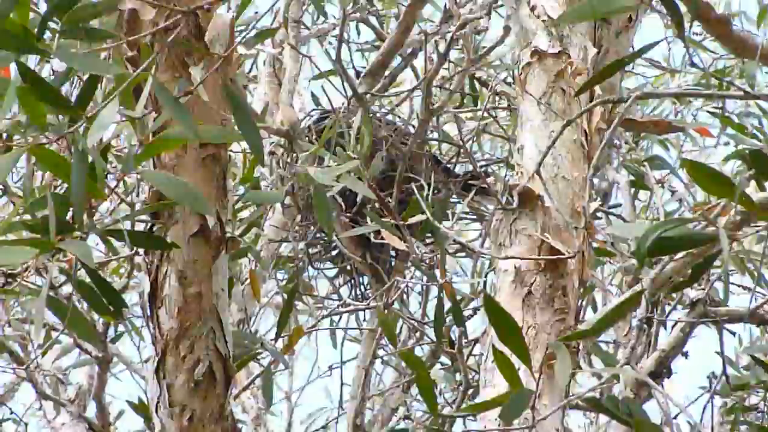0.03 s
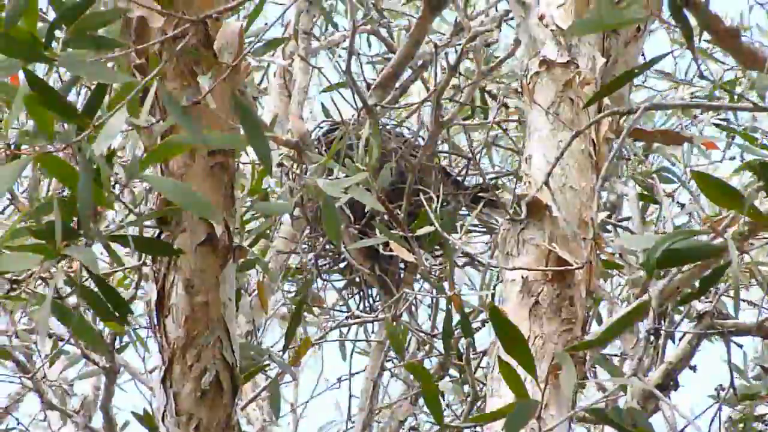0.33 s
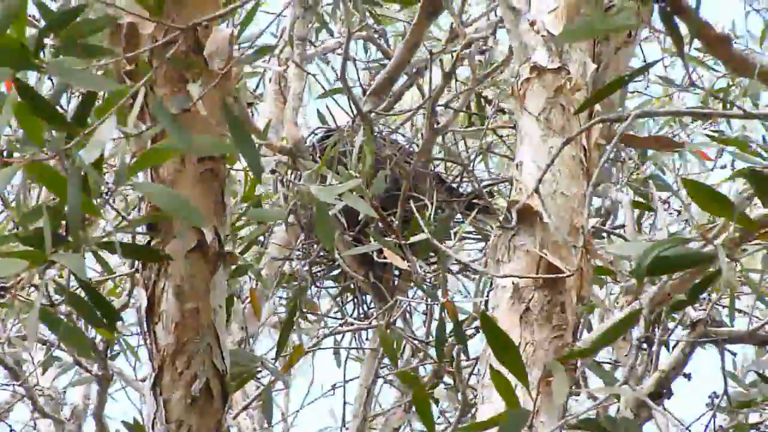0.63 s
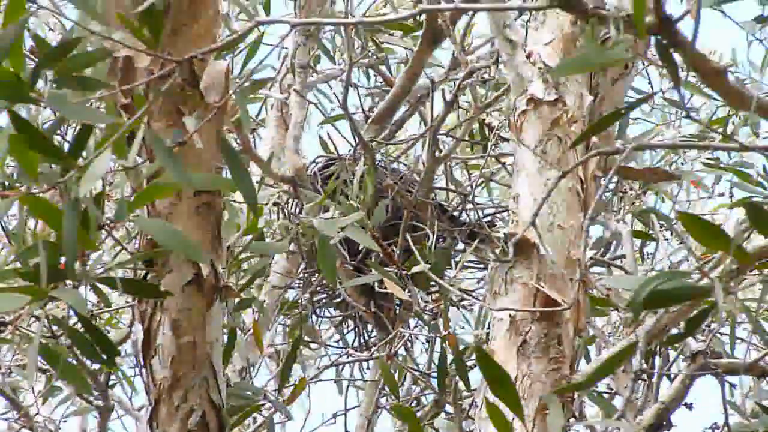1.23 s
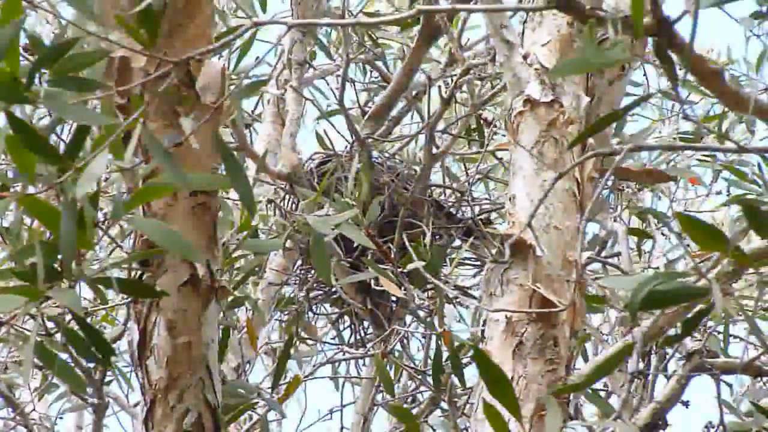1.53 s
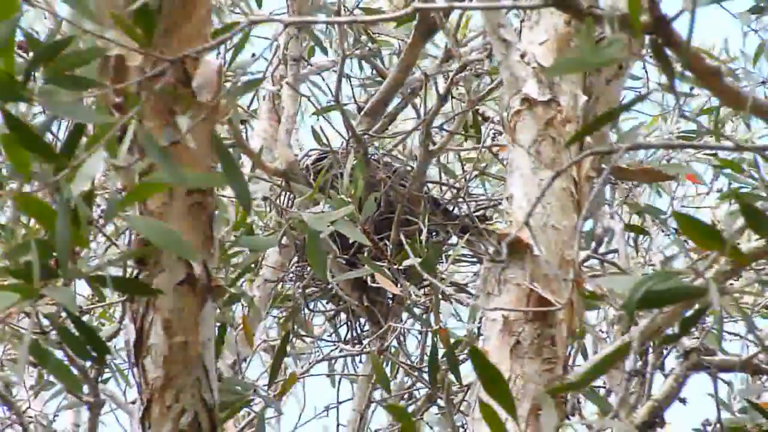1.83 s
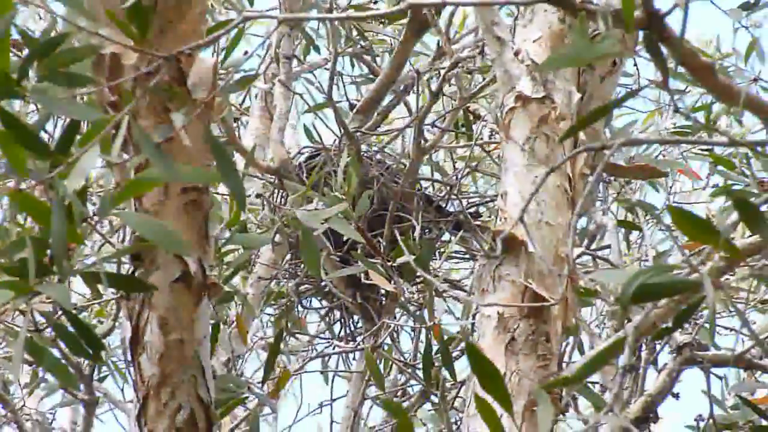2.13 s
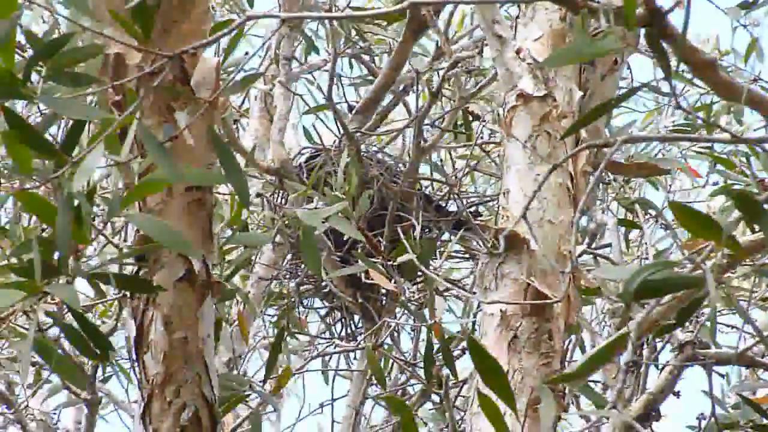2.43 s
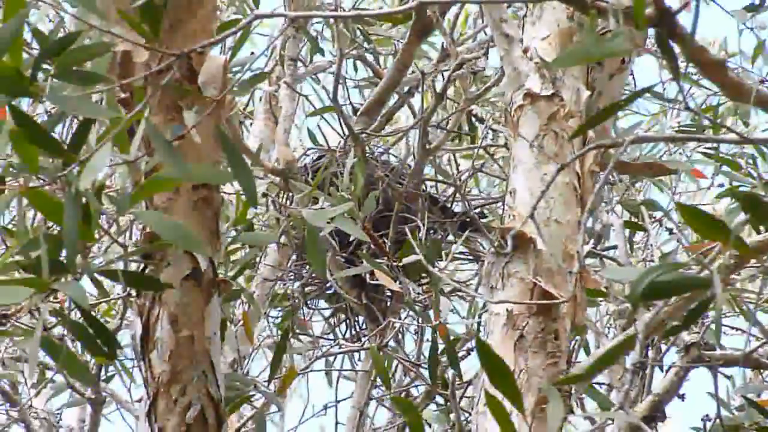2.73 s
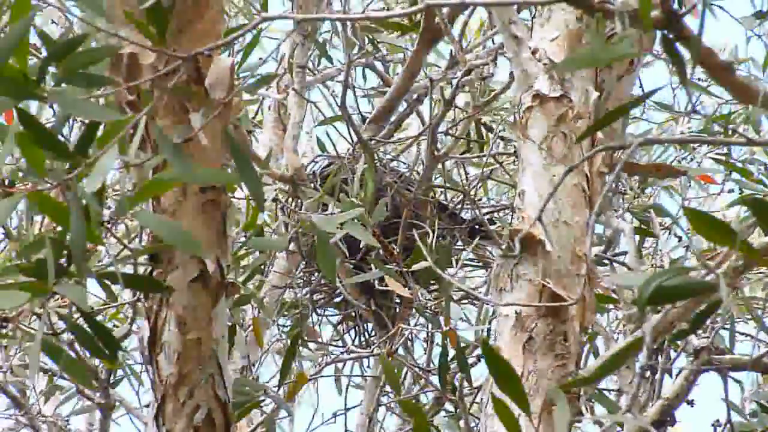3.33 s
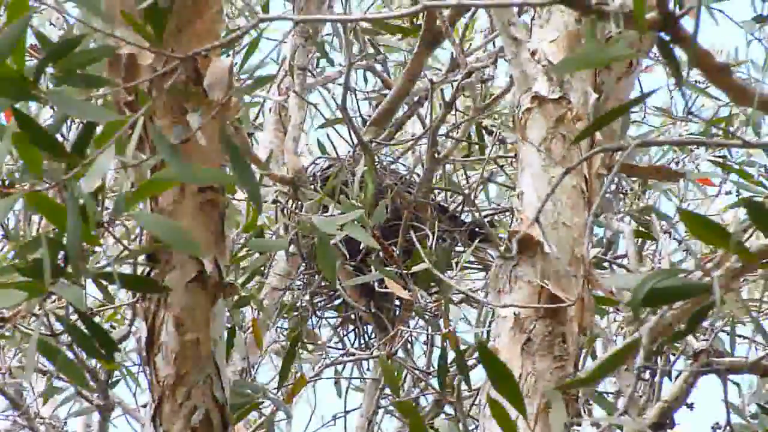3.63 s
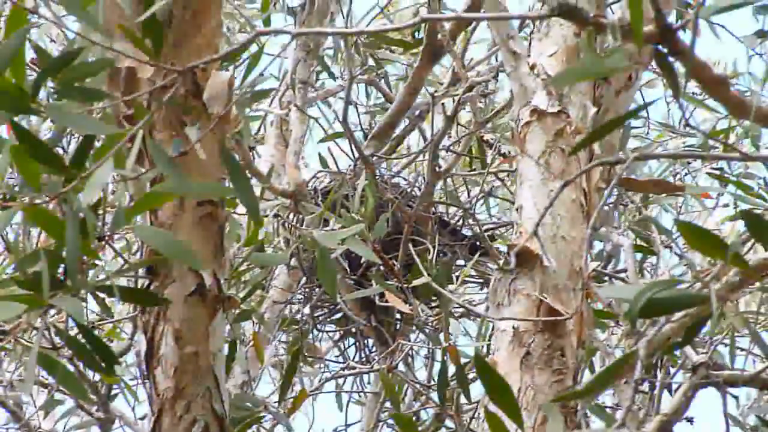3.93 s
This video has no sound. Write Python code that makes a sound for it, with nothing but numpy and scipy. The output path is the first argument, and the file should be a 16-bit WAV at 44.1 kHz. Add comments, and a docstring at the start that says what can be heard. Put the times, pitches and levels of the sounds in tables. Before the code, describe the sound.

Birds call among trees over a soft hush, faint insects and distant traffic that slowly grows. Thin rising chirps come irregularly from 0.3 seconds, the loudest near 3.6. Short cracking yelps sound at 1.3, 2.4 and 3.1 seconds. At 1.5 a nearer bird gives one falling squawk ending in a rasp. Small twig-like snaps come at 0.8 and 2.1 seconds. The calls echo lightly, slightly to the right.

```python
"""After a moment of silence a soft outdoor hush begins, with faint insects and distant traffic whose
roar and hum slowly grow. A bird whistles thin rising chirps, and a twig or bill snaps. A yelp cracks
to a lower, rougher voice, then a nearer bird gives one falling squawk that ends in a rasp.
A second snap, two more yelps and more chirps follow. Trunks and leaves scatter all the calls."""
import sys
import numpy as np
from scipy import signal
from scipy.fft import rfft, irfft
from scipy.io import wavfile
from scipy.ndimage import uniform_filter1d

SR = 44100
rng = np.random.default_rng(int(sys.argv[2]) if len(sys.argv) > 2 else 0)


def store_wav(level_fs):
    """Save 16-bit WAV to argv[1]."""
    pcm = np.round(np.clip(np.atleast_2d(level_fs), -1, 1) * 32767)
    wavfile.write(sys.argv[1], SR, pcm.T.astype(np.int16))


N = 176400
T = np.arange(N) / SR

# still air and far surroundings (frequency [Hz], relative level [dB])
HUSH_SPECTRUM = [(30, -47), (50, -44), (70, -29.5), (125, -17.5), (230, -1.5), (470, -4), (800, -2.5),
                 (1370, -4), (2000, -9.5), (2600, -12.5), (4000, -21), (5300, -23.5), (6600, -26),
                 (7600, -38)]
# how wide the background sounds (frequency [Hz], side minus middle [dB])
STEREO_WIDTH = [(60, -17.5), (125, -19.5), (250, -18.5), (500, -12), (1000, -7.5), (2000, -4), (4000, -1),
                (7000, -2.5)]
# which way it leans (frequency [Hz], left minus right [dB])
STEREO_LEAN = [(60, 0), (100, 4.5), (170, 1.5), (300, 1.5), (500, 1), (860, -0.5), (1460, -0.5), (2480, -4),
               (4220, -6), (7180, -2)]
# tone of the tyre roar (frequency [Hz], relative level [dB])
TYRE_SPECTRUM = [(30, -56), (50, -48), (70, -28.5), (125, -20), (210, -5), (350, -6.5), (560, -2.5),
                 (720, 0.5), (1000, -2.5), (1400, -8), (2100, -10), (3400, -17), (5200, -23.5), (6400, -26),
                 (7600, -39.5)]
# the roar growing (time [s], level [dB])
TYRE_SWELL = [(.13, -60), (.8, -45), (1.5, -40), (2.2, -38), (2.8, -35), (3.3, -34.2), (3.7, -33),
              (4, -32.5)]
# two far engines (time [s], pitch [Hz], relative level [dB])
LOW_ENGINE = [(.13, 60, -79), (.8, 64.7, -73), (1.4, 72.5, -74), (2.0, 82, -62), (2.7, 81, -69),
              (3.3, 79.3, -63), (3.65, 78, -56), (4, 78.5, -63)]
HIGH_ENGINE = [(.13, 90, -68.5), (1.5, 89.7, -67.5), (2.1, 100, -67), (2.5, 102, -72.5), (3, 107.7, -60),
               (3.5, 114.7, -70), (4, 111.5, -71)]
# faint insects (start [s], length [s], pitch [Hz], relative level [dB])
INSECT_NOTES = [(0.135, 0.48, 6410, -64), (.36, .17, 5100, -60), (.63, 0.145, 5145, -61),
                (0.921, 0.16, 5100, -59), (1.135, 0.12, 6390, -65), (1.693, 0.073, 6400, -67),
                (1.903, 1.6, 6324, -69)]
# rising chirps (start [s], rise time [s], first pitch [Hz], top pitch [Hz], relative level [dB])
CHIRP_NOTES = [(.291, .035, 3950, 6240, -42.5), (.827, .037, 3800, 6630, -44),
               (1.418, .030, 4250, 6500, -44), (2.563, .038, 3800, 6300, -43),
               (3.071, .045, 3850, 6700, -40), (3.642, 0.015, 6050, 6900, -43.5),
               (3.649, .037, 4070, 6810, -35)]
# echoes from trunks (delay [s], relative level [dB])
TRUNK_ECHOES = [(.0065, -11.5), (.013, -20.5), (0.023, -21.5), (.029, -22)]
# snaps of a twig or bill (time [s], relative level [dB])
SNAPS = [(.8425, -43), (2.0925, -37.5)]
# the tune of each call (time [s], pitch [Hz], relative level [dB])
FIRST_YELP = [(1.272, 2205, -52), (1.287, 2345, -40), (1.298, 2467, -35), (1.304, 2755, -28.5),
              (1.311, 2698, -32.5), (1.315, 2985, -32), (1.328, 2950, -31), (1.338, 2620, -38.5)]
SQUAWK_TUNE = [(1.472, 2500, -56.5), (1.485, 3045, -42), (1.503, 2860, -40), (1.510, 2590, -29),
               (1.520, 2309, -26), (1.524, 2164, -37), (1.541, 2000, -36), (1.549, 1813, -34.5),
               (1.556, 1653, -33), (1.578, 1423, -40)]
SECOND_YELP = [(2.343, 2137, -53), (2.353, 2226, -36.5), (2.364, 2315, -38), (2.375, 2446, -30.5),
               (2.388, 2506, -37), (2.403, 2490, -43), (2.411, 2380, -42.5)]
THIRD_YELP = [(3.131, 2097, -40), (3.140, 2197, -39.5), (3.158, 2380, -39.5), (3.168, 2845, -29),
              (3.173, 2510, -45.5), (3.192, 2540, -39), (3.2, 2400, -52)]
# how throat and bill colour each call (frequency [Hz], relative level [dB])
FIRST_THROAT = [(1000, -21), (2000, -10.5), (2400, -7.5), (3000, 1), (4000, -1), (4900, -1.5), (5600, 6),
                (6300, -5.5), (7000, -15), (7800, -26.5)]
SQUAWK_THROAT = [(900, -34), (1600, -18.5), (2100, -5.5), (2700, 1.5), (3300, -4), (4100, -11),
                 (4700, -26.5), (5700, -20), (7000, -40.5)]
SECOND_THROAT = [(1200, -10.5), (2300, -1.5), (3600, -0.5), (4900, -0.5), (6000, -16.5), (7000, -7.5),
                 (7800, -19.5)]
THIRD_THROAT = [(1200, -20.5), (2300, -1.5), (3800, -1.5), (4300, -14), (5200, -2.5), (6200, -19),
                (7000, -11), (7800, -26.5)]
# the rasp ending the squawk (time [s], ringing pitch [Hz], relative level [dB])
RASP_TUNE = [(1.578, 2900, -40), (1.583, 2763, -31.5), (1.59, 2727, -31), (1.594, 2574, -37.5),
             (1.612, 2525, -36), (1.627, 2504, -36), (1.630, 2420, -44)]

WOBBLE_S, LEVEL_WOBBLE = .0025, .38  # how quickly a bird's voice wobbles, and how much in level


def amp(db):
    """Turns decibels into a number to multiply by."""
    return 10 ** (np.asarray(db) / 20)


def unit(x):
    """Scales a signal to an average (rms) size of 1."""
    return x / np.sqrt(np.mean(x ** 2) + 1e-20)


def level_at(points, hz):
    """Looks up a level by frequency, with octaves evenly spaced."""
    known_hz, db = np.transpose(points)
    return np.interp(np.log(hz + 1), np.log(known_hz + 1), db)


def trace(points, t):
    """Reads every column of a curve at times t."""
    times, *columns = np.transpose(points)
    return [np.interp(t, times, column) for column in columns]


def add(mix, start, sound):
    """Mixes a sound in at a start time in seconds."""
    part = mix[round(start * SR):][:len(sound)]
    part += sound[:len(part)]


def waver(size, seconds):
    """A smooth random wobble; more seconds make it slower."""
    hz = np.fft.rfftfreq(2 * size, 1 / SR)
    return unit(irfft(rfft(rng.standard_normal(2 * size)) / (1 + (hz * seconds) ** 4))[:size])


def angle(hz):
    """How far a wave has turned as its pitch changes."""
    return 2 * np.pi * np.cumsum(hz) / SR


def distant_noise(spectrum, patchy_db):
    """Hush or tyre roar: wide noise with drifting patches, most alike in both ears in the bass."""
    frames, hz = N // 512 + 5, np.fft.rfftfreq(2048, 1 / SR)
    mid_re, mid_im, side_re, side_im, patches = rng.standard_normal((5, frames, len(hz)))
    patches = unit(uniform_filter1d(uniform_filter1d(patches, size=8, axis=0), size=14, axis=1))
    mid = mid_re + 1j * mid_im
    side = (side_re + 1j * side_im) * amp(level_at(STEREO_WIDTH, hz))
    lean = level_at(STEREO_LEAN, hz)
    ears = np.array([(mid + side) * amp(lean / 2), (mid - side) * amp(-lean / 2)])
    ears *= amp(level_at(spectrum, hz) + patchy_db * patches)
    return unit(signal.istft(ears.swapaxes(1, 2), nperseg=2048, noverlap=1536)[1][:, :N])


def engine(curve):
    """A far engine fires so fast that it hums, wavering in level."""
    hz, db = trace(curve, T)
    return amp(db) * unit(np.sin(angle(hz)) * (1 + .41 * waver(N, .2)))


def insect(start, length, hz, db, fuzz_hz=50):
    """A thin whistle, made fuzzy by random wobbles."""
    t = np.arange(0, length, 1 / SR)
    whistle = waver(len(t), 1 / fuzz_hz) * np.sin(2 * np.pi * hz * t)
    whistle += waver(len(t), 1 / fuzz_hz) * np.cos(2 * np.pi * hz * t)
    return start, amp(db) * signal.windows.tukey(len(t), .3) * whistle


def chirp(start, rise, first_hz, top_hz, db, fade_in_s=.014, drop_s=.007, sag_db=-7):
    """A whistle sweeps up, then drops away as the bill shuts."""
    t = np.arange(0, rise + drop_s, 1 / SR)
    up, down = np.minimum(t / rise, 1), np.clip((t - rise) / drop_s, 0, 1)
    level = np.minimum(t / fade_in_s, 1) * amp(db + sag_db * up ** 2) * (1 - down ** 4)
    level *= 1 + LEVEL_WOBBLE * waver(len(t), WOBBLE_S)
    hz = (first_hz + (top_hz - first_hz) * up ** 1.1) * (1 - .38 * down)
    hz *= 1 + .018 * waver(len(t), WOBBLE_S)
    return start, np.sqrt(2) * level * np.sin(angle(hz))


def trees(sound, echo_db, near_fade_s=.48, far_fade_s=1):
    """Sound arrives from the right, bounces off trunks and scatters from near and far leaves."""
    t, ears = np.arange(SR) / SR, []
    for ear_db in (-3, 1):  # left, right
        near, far = rng.standard_normal((2, SR)) * np.minimum(t / .0077, 1)
        near = amp(-5.5) * unit(near * amp(-60 * t / near_fade_s))
        far = amp(-14.5) * unit(far * amp(-60 * t / far_fade_s))
        path = amp(echo_db) * (near + far) / np.sqrt(SR)
        add(path, 0, amp([ear_db]))  # straight to the ear
        for delay, trunk_db in TRUNK_ECHOES:
            add(path, delay + rng.uniform(0, .0005), amp([ear_db + echo_db + trunk_db]))
        ears.append(signal.fftconvolve(sound, path)[:N])
    return np.array(ears)


def snap(start, db, fade_s=.0011):
    """A twig or bill snaps: a very short burst of bright noise."""
    t = np.arange(0, .01, 1 / SR)
    bright = signal.butter(2, [2500, 7500], "band", fs=SR, output="sos")
    burst = signal.sosfilt(bright, rng.standard_normal(len(t)))
    return start, amp(db) * unit(burst) * np.exp(-t / fade_s)


def cracking_call(tune, throat, crack_at, wobble, slower=2):
    """A clear note cracks: its wave repeats more slowly, adding tones below and between its own."""
    t = np.arange(tune[0][0], tune[-1][0], 1 / SR)
    hz, db = trace(tune, t)
    cracked = np.clip((t - crack_at) / .00095, 0, 1)
    pitch_wobble = np.interp(cracked, [0, 1], wobble)  # before and after the crack
    phase = angle(hz * (1 + pitch_wobble * waver(len(t), WOBBLE_S)))
    k = np.arange(1, 11)[:, None]  # overtone numbers of the lower voice
    gain = amp(level_at(throat, hz * k / slower)) * np.where(k % slower, cracked, 1)
    tones = gain * np.sin(phase * k / slower + rng.uniform(0, 2 * np.pi, k.shape))
    voice = tones.sum(0) / np.sqrt((gain ** 2).sum(0) / 2)
    return t[0], amp(db) * voice * (1 + LEVEL_WOBBLE * waver(len(t), WOBBLE_S))


def rasp(pulse_hz=185, depth=.59):
    """Uneven pulses make the throat ring on one falling note."""
    t = np.arange(RASP_TUNE[0][0], RASP_TUNE[-1][0], 1 / SR)
    hz, db = trace(RASP_TUNE, t)
    pulses = 1 + depth * np.cos(angle(pulse_hz * (1 + .15 * waver(len(t), .008))))
    ring = np.sin(angle(hz * (1 + .035 * waver(len(t), WOBBLE_S))))
    return t[0], amp(db) * unit(pulses * ring)


def scene():
    """Birds among the trees, the squawking one nearest, over hush, traffic and insects."""
    yelps, chirps, near_bird, insects = np.zeros((4, N))
    add(yelps, *cracking_call(FIRST_YELP, FIRST_THROAT, crack_at=1.312, wobble=(.034, .045), slower=3))
    add(yelps, *cracking_call(SECOND_YELP, SECOND_THROAT, crack_at=2.372, wobble=(.01, .029)))
    add(yelps, *cracking_call(THIRD_YELP, THIRD_THROAT, crack_at=3.17, wobble=(.0082, .01)))
    add(near_bird, *cracking_call(SQUAWK_TUNE, SQUAWK_THROAT, crack_at=1.522, wobble=(.006, .018)))
    for row in CHIRP_NOTES:
        add(chirps, *chirp(*row))
    add(near_bird, *rasp())
    for row in SNAPS:
        add(near_bird, *snap(*row))
    for row in INSECT_NOTES:
        add(insects, *insect(*row))
    insects = insects * amp([[-1], [-5]])  # louder on the left
    tyres = amp(trace(TYRE_SWELL, T)[0]) * distant_noise(TYRE_SPECTRUM, patchy_db=1.38)
    engines = amp(-6.5) * engine(LOW_ENGINE) + engine(HIGH_ENGINE)
    birds = trees(yelps, echo_db=4) + trees(chirps, echo_db=-1) + trees(near_bird, echo_db=.5)
    hush = amp(-39) * distant_noise(HUSH_SPECTRUM, patchy_db=.9)
    return hush + tyres + engines + insects + birds


def record(dry):
    """The sound starts after a moment of silence, with its highest treble cut away."""
    start_s, top_hz = .129, 7700
    treble_cut = signal.firwin(601, top_hz, window=("kaiser", 9), fs=SR)
    return signal.oaconvolve(dry * (T >= start_s), treble_cut[None], "same")


dry = scene()
out = record(dry)
store_wav(out)
```